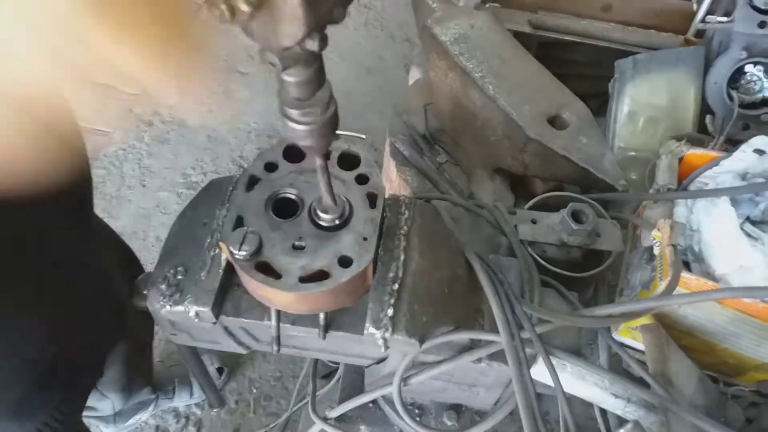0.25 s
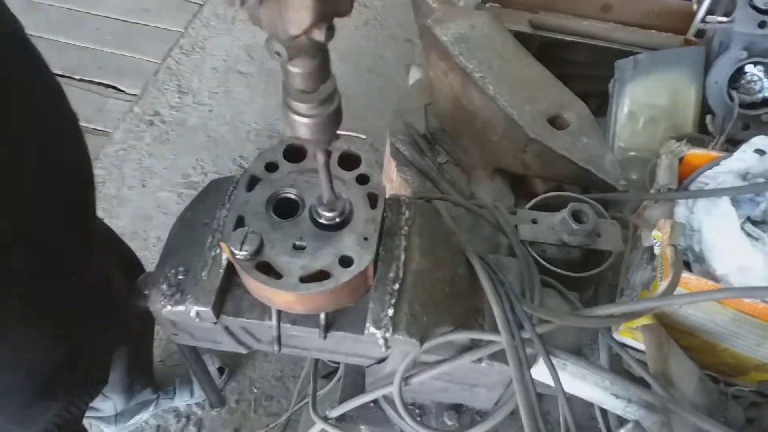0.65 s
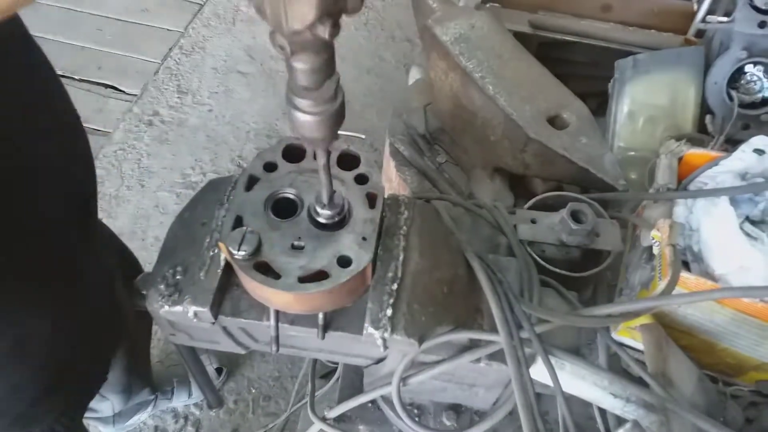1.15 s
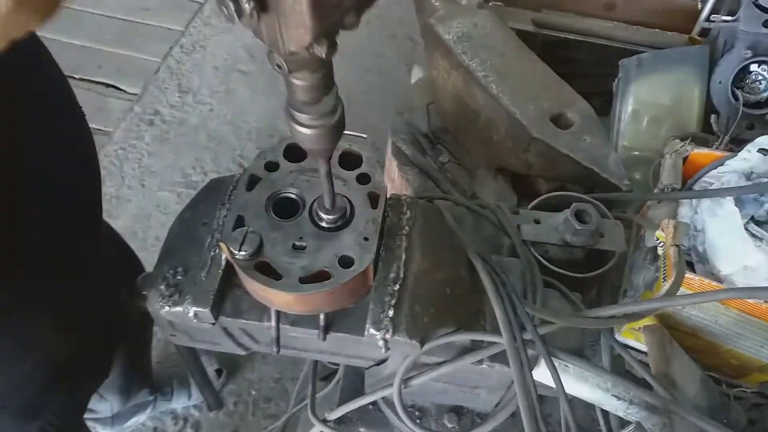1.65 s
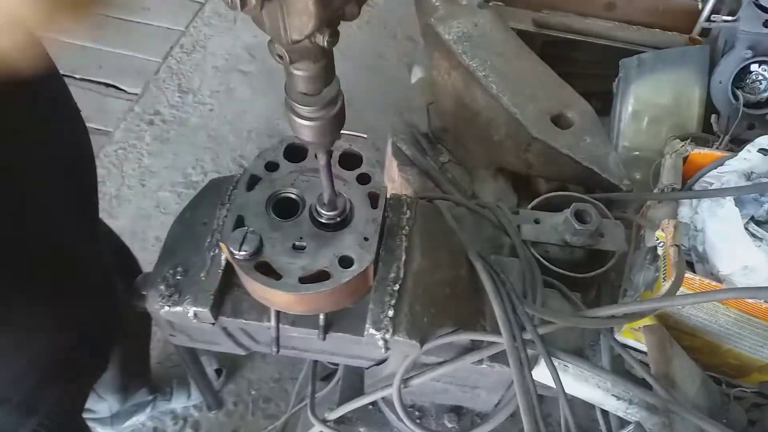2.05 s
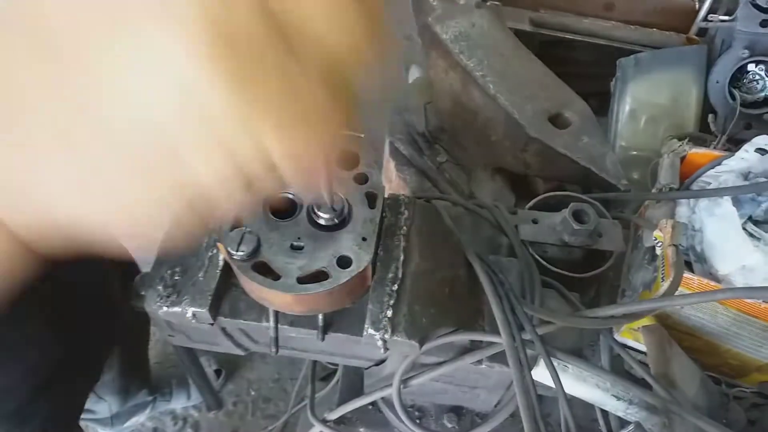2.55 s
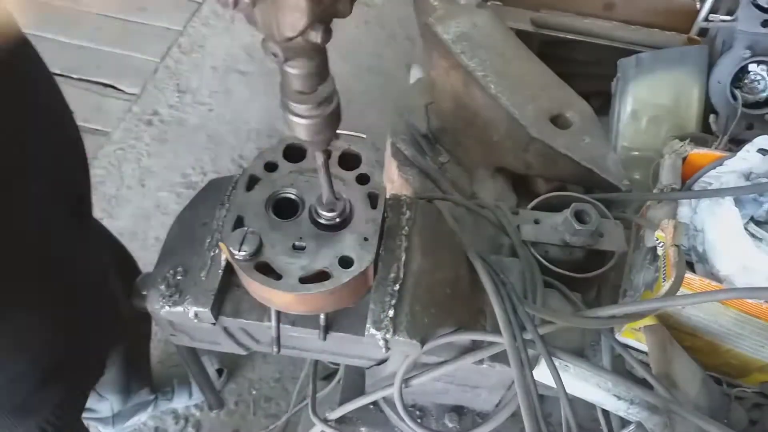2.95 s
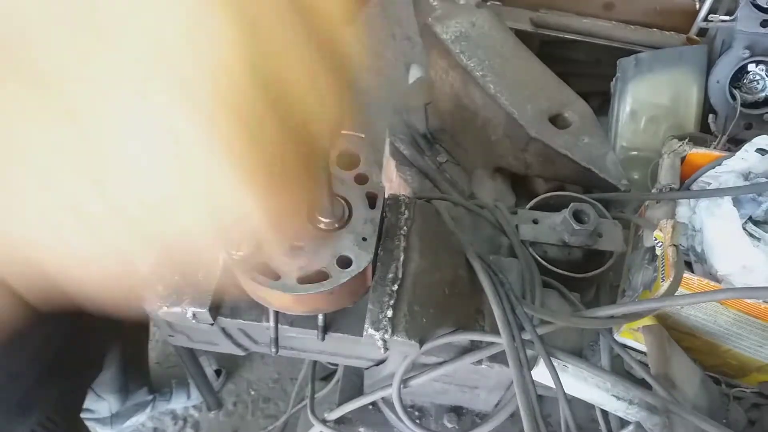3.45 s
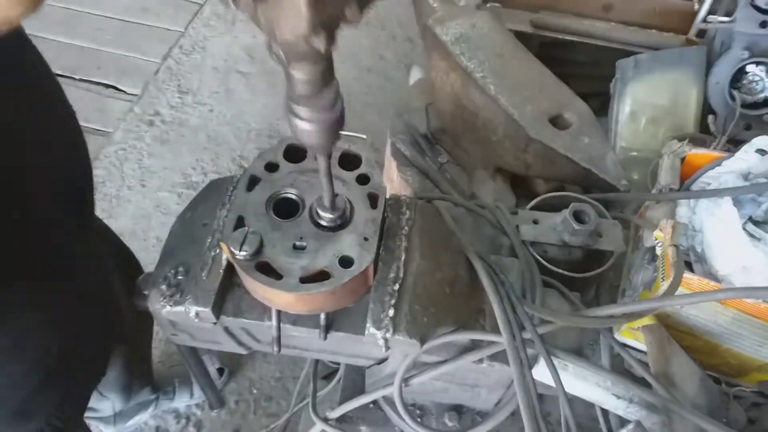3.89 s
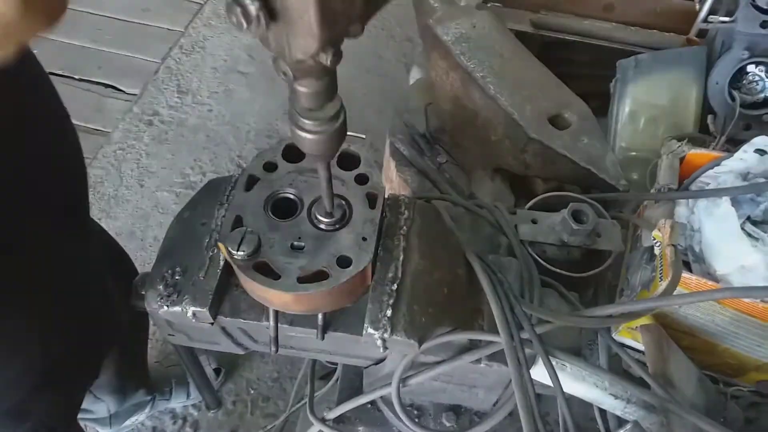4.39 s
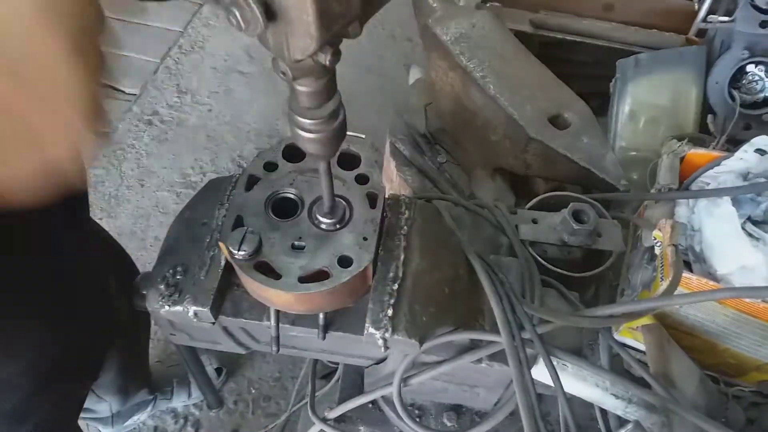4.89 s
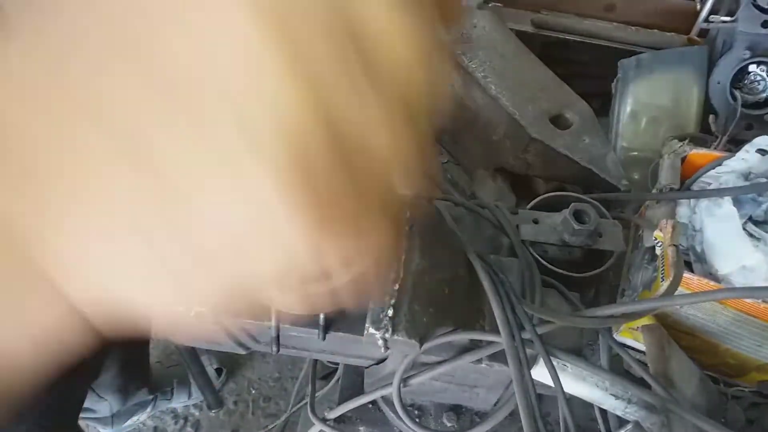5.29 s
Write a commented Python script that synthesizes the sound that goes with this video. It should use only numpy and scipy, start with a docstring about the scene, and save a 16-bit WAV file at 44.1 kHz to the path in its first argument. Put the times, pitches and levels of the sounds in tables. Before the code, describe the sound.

A hand lever laps a steel valve in its seat: regular clanks, each followed by a gritty metal scrape, about twice a second.

```python
"""Lapping a valve by hand lever

A valve is lapped in its seat by a hand lever swung round about twice a second, in a small workshop.
Each stroke starts with a clank as the slack is taken up: chattering noise plus ringing steel modes.
Paste then grinds between the steel faces: grains of noise, stem hiss, a singing seat and a rumbling frame.
As the valve slows, separate slips stand out; three times it catches and squawks on wavering tones.
Faint ticks run through the back swings, single clicks stand out, and a short dull room tail follows."""
import sys
import numpy as np
from scipy import signal
from scipy.fft import rfft, irfft, next_fast_len
from scipy.io import wavfile

SR = 44100
rng = np.random.default_rng(int(sys.argv[2]) if len(sys.argv) > 2 else 0)


def log_audio(samples):
    """Write samples as a 16-bit WAV file to the path given in sys.argv[1]."""
    # one column per channel
    frames = np.atleast_2d(samples).T
    # limit to full scale, then quantise
    limited = np.clip(frames, -1, 1)
    pcm = np.round(limited * 32767).astype(np.int16)
    wavfile.write(sys.argv[1], SR, pcm)


N = 243873
TIME = np.arange(N) / SR  # seconds

# Strokes of the lever, each a clank and then a push; all levels are relative:
# start_s, clank_db, thud_db, ring_db (near 1 kHz), edge_db (bright shelf), clank_t60_s,
# grinding_db, swell_db (rise over the push), push_s, release_s, stem_hiss_db, singing_db, back_swing_db
STROKES = [(-0.16, -10, 0, 0, -3, .05, -33, 2, .25, 0.082, 6, 0.5, -52),
           (0.2999, -6.5, -5.5, -7, -4, 0.057, -33, 0, 0.21, 0.065, 2, -2.5, -53),
           (0.7423, -9.5, 0, 1.5, -3, 0.076, -33, -0.5, 0.25, .08, 3, -5, -51.5),
           (1.205, -11, 1.5, 4.5, -5, 0.055, -32, 4, 0.2, .1, -2.5, -2.5, -46),
           (1.6786, -7, -3.5, -4.5, -6.5, 0.043, -30, 4, .15, 0.16, -6.5, -9.5, -47.5),
           (2.1355, -11, 2, 1, 0.5, 0.08, -35, -1, .17, 0.16, -6, -4.5, -57.5),
           (2.5921, -12, 1, 2, -4.5, .051, -32.5, 3.5, 0.23, 0.067, 1.5, -10, -48.5),
           (3.032, -6, -3, -3, -6, 0.052, -33.5, 2, 0.2, .12, 0, -12, -55),
           (3.454, -7.5, -3.5, -0.5, 0, 0.065, -35, 1.5, 0.29, 0.044, -19, -9, -57),
           (3.9068, -8, -1.5, -2, -7, 0.052, -34.5, 8, .19, 0.097, -2, -6, -45.5),
           (4.3827, -13.5, 1, -8, -10.5, 0.057, -36, 0.5, .17, 0.22, -25, -9, -50.5),
           (4.824, -11, 1.5, -3, 0.5, 0.057, -35, -1, 0.19, 0.27, -21, -4, -58),
           (5.2876, -11, -0.5, -1, -1.5, 0.048, -33.5, 2.5, 0.23, .1, -4, -10, -48)]
# Modes of the bench and frame: pitch_hz, level_db (relative), t60_s
FRAME_MODES = [(74.2, -13, 0.59), (130.7, -2, 0.15), (166, 1, 0.26), (235.2, -4.5, 0.29),
               (262.8, -5.5, 0.21), (311.2, -10, 0.36), (340.8, -11, 0.34), (482, -7, 0.2),
               (658.6, -2.5, 0.15)]
# Modes of the cylinder head: pitch_hz, level_db (relative), t60_s
HEAD_MODES = [(748, -12, 0.11), (857, -16, 0.26), (931, 1, 0.17), (980, 5.5, 0.054), (1044, -14, 0.04),
              (1070, -32, 0.18), (1340, -17, 0.36), (2970, -32, 0.056)]
# Peaks and notches of the steel parts: centre_hz, width_hz, gain_db
STEEL_PEAKS = [(1450, 120, 0.5), (1536, 48, 6), (1840, 160, 6), (2000, 63, -10.5), (2245, 175, 4.5),
               (2500, 20, -9), (2547, 77, 5), (2913, 255, 7), (3500, 280, 2.5), (4000, 300, 2),
               (4734, 84, 6.5), (5740, 350, 1.5), (6720, 640, -3.5), (8150, 110, 5.5)]
# Spectrum of the clank's chatter: freq_hz, density_db (relative, per Hz)
CLANK_TONE = [(40, -56), (80, -23), (140, 2), (400, -2.5), (800, 0), (1250, -1), (1800, 0), (3000, -0.5),
              (5500, 1.5), (7600, -1.5), (9000, -16), (12500, -12.5), (15800, -20)]


def clanks():
    """Loose steel parts chatter together for a few hundredths of a second and set head and frame ringing."""
    out, t = np.zeros(N), TIME[:SR // 2]
    steel = colour(CLANK_TONE, STEEL_PEAKS)
    rattle = amp(1.2 * drift(450))
    attack = np.minimum(t / .0018, 1)
    since_hold = np.maximum(t - .0055, 0)
    treble = signal.butter(1, 4000, "high", fs=SR)
    for start, clank_db, thud_db, ring_db, edge_db, t60, *_ in STROKES:
        contact = attack * amp(-60 * since_hold / t60)
        rattle_here = np.roll(rattle, -round(start * SR))[:len(t)]
        chatter = through(contact * rattle_here * rng.choice([-1, 1], len(t)), steel)
        # treble shelf: the bright edge of this clank
        chatter = chatter + (amp(edge_db) - 1) * signal.lfilter(*treble, chatter)
        thud_swell = 1 - np.exp(-t / 0.0041)
        thud = amp(thud_db - 18) * ring(FRAME_MODES, scatter=1.8) * thud_swell
        add(out, start, amp(clank_db) * (amp(-4) * chatter + thud))
        # the head answers slightly late
        head = amp(clank_db + ring_db - 10) * ring(HEAD_MODES) * attack
        add(out, start + 0.001597, head)
    return out


def grinding():
    """Paste grains crush under the turning valve; as it slows it sticks and slips, ever more sparsely."""
    age, row = lever()
    level_db, swell_db, push_s, release_s, hiss_db, sing_db, back_db = row[6:]
    # the swell runs to the end of the push; the release falls 20 dB in each release time
    push_db = swell_db * np.minimum(age / push_s - 1, 0) - 20 * np.maximum(age - push_s, 0) / release_s
    attack = np.minimum(age / 0.0095, 1)
    push = attack * amp(level_db + push_db)
    force = np.hypot(push, amp(-2.5) * back_swing(age, back_db))
    # the lever bears down hardest in mid stroke
    press = np.interp(age, [0, .06, .15, .22, .3], [.3, .7, 1, .8, .3])
    # the clank sets the seat singing, a kick that fades at 156 dB/s
    kick = attack * amp(-25.5 - 156 * age)
    singing = np.hypot(force * amp(sing_db), kick)
    faces = force * (paste_grit(age) + amp(-1) * slip_scratches(age) + press * frame_rumble())
    stem = stem_hiss(age, force * press * amp(hiss_db))
    seat = amp(-3) * np.sqrt(press) * singing * seat_song(press)
    return faces + stem + seat


# Spectrum of the crushing paste: freq_hz, density_db (relative, per Hz)
GRIT_TONE = [(40, -30), (80, -16), (200, -15), (450, -13), (750, -6), (1400, -6.5), (1900, -9),
             (2500, -0.5), (3200, 1), (4600, -8), (7400, -11), (9000, -20), (12500, -22.5), (15800, -24)]


def paste_grit(age):
    """Some 6000 random grains a second, of uneven size, crush and weaken late in the stroke."""
    size = amp(2.5 * np.minimum(rng.exponential(1, N), 4))
    grains = rng.standard_normal(N) * (rng.random(N) < 6000 / SR) * size
    late_gain = np.interp(age, [.15, .3], [1, 0.44])
    return patchy(through(grains, colour(GRIT_TONE)), 1.55) * late_gain


# Spectrum of slips, clicks and rasp: freq_hz, density_db (relative, per Hz)
TICK_TONE = [(100, -18), (450, -5), (1100, -1), (1600, 4.5), (2100, 2.5), (3000, 0), (4500, 4), (7400, 4.5),
             (9000, -11.5), (12500, -16), (15800, -19)]


def slip_scratches(age):
    """Each slip is a short bright scratch of noise; their rate falls towards some 50 a second."""
    rate_hz = (48 + 550 * np.exp(-age / .08)) * np.exp(.25 * drift(60))
    slips = np.diff(np.floor(np.cumsum(rate_hz) / SR), prepend=0)
    slips = slips * amp(2 * rng.standard_normal(N)) / np.sqrt(rate_hz)
    # each slip dies away with a 3 ms time constant
    fade = signal.lfilter([1], [1, -np.exp(-1 / (.003 * SR))], slips)
    scratch = fade * rng.standard_normal(N)
    scratch = signal.lfilter(*signal.butter(2, 8000, fs=SR), scratch)
    # the valve sticks most towards the end of the push
    sticking = np.interp(age, [.04, .18, .26, .33], [.15, .5, 1, .4])
    return patchy(through(scratch, colour(TICK_TONE)), 2.0) * sticking


# Soft scuffs of the stem on the back swing: start_s, length_s, level_db (relative)
SCUFFS = [(3.854, 0.036, -42.5)]


def stem_hiss(age, force):
    """The stem gives a hoarse resonant hiss that climbs in each stroke and wanders a little above 3 kHz."""
    centre_hz = 3080 + 220 * np.minimum(age / .2, 1) + 170 * drift(60)
    hiss = resonate(rng.standard_normal(N), centre_hz, 560)
    level = force * amp(-2.5 + 2.5 * drift(90))
    for start, length, level_db in SCUFFS:
        add(level, start, amp(level_db) * np.hanning(round(length * SR)))
    return level * hiss


def seat_song(press):
    """The seat sings in fits near 1 kHz, higher under more pressure."""
    centre_hz = 900 + 150 * press + 45 * drift(30)
    return resonate(rng.standard_normal(N), centre_hz, 170) * amp(2 * drift(40))


def frame_rumble():
    """Noise rumbles through the frame's modes and drones near its strongest one."""
    rumble = unit(through(rng.standard_normal(N), ring(FRAME_MODES, scatter=2.34)))
    drone = resonate(rng.standard_normal(N), 168, 30)
    return amp(-13) * rumble + amp(-10) * drone


# Where the valve catches: start_s, length_s (the fade starts halfway), level_db (relative), pitch_hz
SQUAWKS = [(1.383, 0.032, -29.5, 1090), (2.243, 0.043, -23, 1055), (4.951, 0.032, -21, 1110)]
# Tones of a squawk: pitch_multiple, width_hz, level_db (relative)
SQUAWK_TONES = [(1, 35, -4.5), (1.161, 59, -10), (2.169, 150, -9), (3.2, 522, -6.5)]


def squawks():
    """The valve catches: a rough, wavering stack of tones with a rasp of noise on top."""
    out = np.zeros(N)
    for start, length, level_db, pitch_hz in SQUAWKS:
        age = TIME - start
        fade = np.exp(-np.maximum(age - length / 2, 0) / 0.019)
        swell = np.clip(age / 0.0042, 0, 1) * fade
        phase = 2 * np.pi * np.cumsum(pitch_hz * (1 + 0.0163 * drift(56.4))) / SR
        tones = np.zeros(N)
        for multiple, width_hz, tone_db in SQUAWK_TONES:
            # frequency wander spreads each tone over its width
            wander = 2 * np.pi * np.cumsum(width_hz / 2 * drift(2 * width_hz)) / SR
            tones += amp(tone_db) * np.sqrt(2) * np.sin(multiple * phase + wander)
        rasp = unit(through(rng.standard_normal(N), colour(TICK_TONE, STEEL_PEAKS)))
        out += amp(level_db) * swell * (tones + amp(-3) * swell * rasp)
    return out


# The clearest clicks of valve and linkage: start_s, level_db (relative), colour_centre_hz
TICKS = [(0.2269, -33.5, 2000), (0.29, -29, 5040), (0.5094, -24.5, 3380), (0.557, -30, 4280),
         (0.656, -18.5, 3560), (0.7162, -29, 5800), (0.7346, -29, 4950), (1.102, -23.5, 4000),
         (1.371, -19, 3416), (1.4834, -28, 5220), (1.5266, -25, 2950), (1.958, -20, 3500),
         (1.9946, -30, 4500), (2.1286, -32, 5700), (2.3464, -25, 3000), (2.3603, -20, 3740),
         (2.397, -31, 4930), (2.543, -26, 4480), (2.8288, -19, 4270), (2.84, -22.5, 2786),
         (2.9452, -29, 3400), (3.0168, -31, 5400), (3.2786, -21, 3630), (3.394, -23, 3340),
         (3.7017, -24.5, 3880), (3.8189, -26.5, 3000), (3.8259, -34.5, 2330), (4.0434, -24.5, 3614),
         (4.187, -24, 4920), (4.2286, -29, 3830), (4.251, -24.5, 3370), (4.619, -26.5, 5030),
         (4.6544, -19.5, 3330), (5.2512, -14, 2200)]


def ticks():
    """Single slips and linkage clicks, each with its own colour."""
    out = np.zeros(N)
    for start, level_db, centre_hz in TICKS:
        add(out, start, amp(level_db + .5) * click(centre_hz))
    return out


def judder():
    """On the back swing the valve skips in a nearly even run of faint ticks, about 51 a second."""
    age, row = lever()
    out, contact = np.zeros(N), back_swing(age, row[-1])
    turns = np.cumsum(51 * np.exp(0.067 * drift(15))) / SR
    skips = np.flatnonzero((np.diff(np.floor(turns), prepend=0) > 0) & (age > .21))
    for at, (force, tint) in zip(skips, rng.standard_normal((len(skips), 2))):
        # uneven by 4 dB, the strongest skips held back
        level = contact[at] * amp(15.5 + 4 * min(force, 1))
        add(out, TIME[at], level * click(5300 * np.exp(0.2 * tint)))
    return out


def click(hz):
    """A short scrape of contact noise, filtered through the steel's peaks and coloured about hz."""
    t = TIME[:SR // 12]
    fade = np.exp(-t / .0028) * np.minimum(t / .0006, 1)
    tone = colour(TICK_TONE, STEEL_PEAKS + [(hz, hz / 2, 5.5)])
    return through(fade * rng.choice([-1, 1], len(t)), tone)


def lever():
    """At every moment: the time since the stroke began, and the columns of that stroke's row."""
    rows = np.array(STROKES)
    latest = np.searchsorted(rows[:, 0], TIME, side="right") - 1
    now = rows[np.maximum(latest, 0)]
    return np.maximum(TIME - now[:, 0], 0), now.T


def back_swing(age, back_db):
    """Light contact that grows over the first 0.28 s, then fades at 40 dB/s until the next clank."""
    full_s = 0.28
    return amp(back_db - 40 * np.maximum(age - full_s, 0)) * np.minimum(age / full_s, 1) ** 2


def shimmer(x):
    """Countless short modes of the steel, as a burst of treble noise, add a fine metallic grain."""
    t = TIME[:SR // 25]
    treble = signal.butter(2, 5000, "high", fs=SR, output="sos")
    modes = signal.sosfilt(treble, rng.standard_normal(len(t))) * np.exp(-t / .006)
    return x + .45 * through(x, modes / np.linalg.norm(modes))


def workshop(x):
    """A cluttered room returns a short, dull tail of sparse random echoes."""
    t, t60 = TIME[:SR // 2], 0.28
    sparse = (rng.random(len(t)) < .08) * (t > .006)
    taps = rng.standard_normal(len(t)) * sparse * amp(-60 * t / t60)
    tail = signal.lfilter(*signal.butter(1, 5000, fs=SR), taps)
    return x + amp(-15) * through(x, tail / np.linalg.norm(tail))


# Spectrum of the quiet shop: freq_hz, density_db (relative, per Hz)
SHOP_TONE = [(25, -30), (45, -6), (70, 3), (170, 5.5), (400, -5.5), (1000, -11.5), (3500, -29), (6000, -28),
             (9000, -24.5), (15800, -17)]


def shop_quiet():
    """The quiet of the shop: steady, faint noise, mostly bass."""
    return amp(-55.5) * through(rng.standard_normal(N), colour(SHOP_TONE))


def amp(db):
    """Decibels to gain."""
    return 10 ** (np.asarray(db) / 20)


def unit(x):
    """Scales to rms 1."""
    return x / np.sqrt(np.mean(x ** 2) + 1e-20)


def add(mix, s, sound):
    """Mixes a sound in at time s, cutting off what falls outside."""
    at = round(s * SR)
    room = max(len(sound) + min(at, 0), 0)
    part = mix[max(at, 0):][:room]
    sound = sound[max(-at, 0):]
    part += sound[:len(part)]


def drift(hz):
    """Slow chance of rms 1, up to the given rate."""
    count = max(int(hz * N / SR), 2)
    partials = rng.standard_normal(count) + 1j * rng.standard_normal(count)
    slow = irfft(np.r_[0, partials], count * 10)
    return unit(np.interp(TIME, np.linspace(0, N / SR, len(slow)), slow))


def colour(points, peaks=(), size=4096):
    """Causal (minimum-phase) impulse response of energy 1 with a given spectrum and peaks on it."""
    hz = np.fft.rfftfreq(size, 1 / SR)
    point_hz, point_db = np.transpose(points)
    db = np.interp(np.log(hz + 1), np.log(point_hz), point_db)
    for centre, width, gain in peaks:
        db = db + gain / (1 + (2 * (hz - centre) / width) ** 2)
    log_gain = np.log(amp(np.r_[db, db[-2:0:-1]]))
    response = np.fft.ifft(np.exp(np.conj(signal.hilbert(log_gain)))).real
    return response / np.linalg.norm(response)


def through(x, response):
    """Passes x through an impulse response."""
    return signal.oaconvolve(x, response)[:len(x)]


def ring(modes, scatter=1.0):
    """Dying sines with scattered phases that beat; each blow excites them a little differently."""
    t = TIME[:SR // 2]
    out = np.zeros(len(t))
    for (hz, db, t60), (push, shift) in zip(modes, rng.standard_normal((len(modes), 2))):
        fade = amp(db + 1.5 * push - 60 * t / t60)
        out += fade * np.sin(2 * np.pi * hz * t + scatter * shift)
    return out


def resonate(x, hz, width):
    """A steep resonance of rms 1 whose centre follows the curve hz."""
    turn = np.exp(2j * np.pi * np.cumsum(hz * np.ones(len(x))) / SR)
    pole = np.exp(-np.pi * width / SR)
    # shift the centre to 0 Hz, low-pass there, and shift back
    slow = signal.lfilter([1], np.poly([pole, pole]), x / turn)
    return unit((turn * slow).real)


def patchy(x, depth_db, rate_hz=70):
    """Lets seven bands, half an octave wide in the middle, swell and drop alone, as grains bite here and there."""
    size = next_fast_len(N, True)
    spectrum, hz = rfft(x, size), np.fft.rfftfreq(size, 1 / SR)
    band = np.clip(np.floor(2 * np.log2(hz / 1000 + 1e-6)), 0, 6)
    out = np.zeros(N)
    for k in range(7):
        out += irfft(spectrum * (band == k), size)[:N] * amp(depth_db * drift(rate_hz))
    return unit(out)


def scene():
    """The lapping, close by, over the quiet of the shop."""
    lapping = clanks() + grinding() + squawks() + ticks() + judder()
    return (workshop(shimmer(lapping)) + shop_quiet())[None]


def record(dry):
    """A small microphone drops the deep bass, peaks stop at full scale; then the band limit."""
    bass_cut = signal.butter(4, 62, "high", fs=SR, output="sos")
    sound = np.clip(signal.sosfilt(bass_cut, dry), -1, 1)
    band_limit = signal.firwin(401, 15900, window=("kaiser", 8), fs=SR)
    return signal.oaconvolve(sound, band_limit[None], "same")


dry = scene()
out = record(dry)
log_audio(out)
```